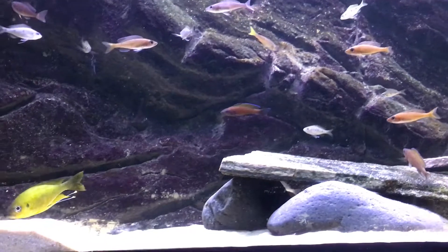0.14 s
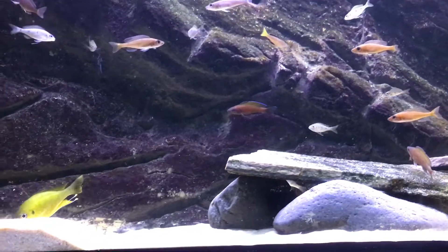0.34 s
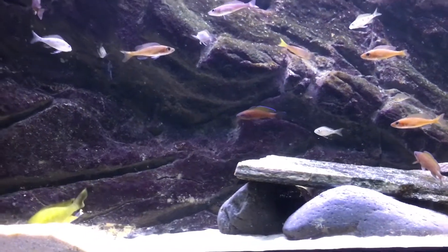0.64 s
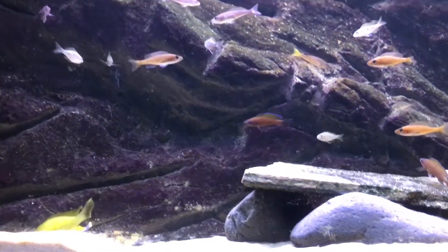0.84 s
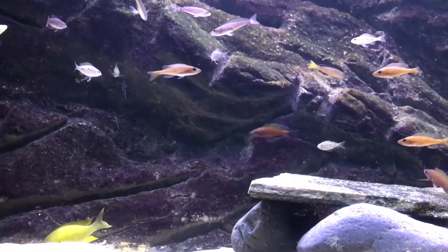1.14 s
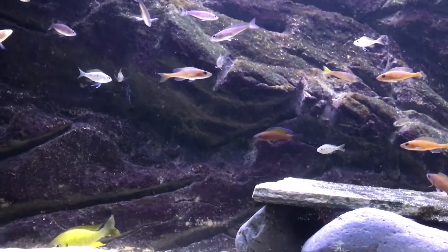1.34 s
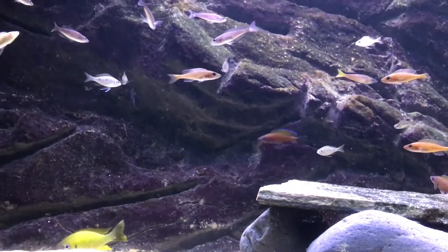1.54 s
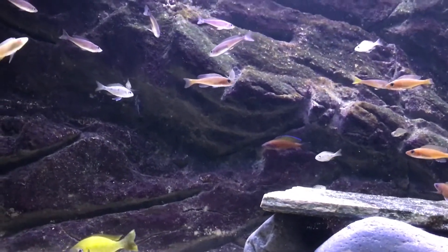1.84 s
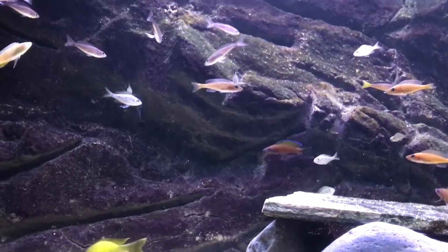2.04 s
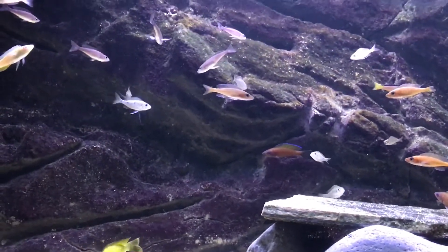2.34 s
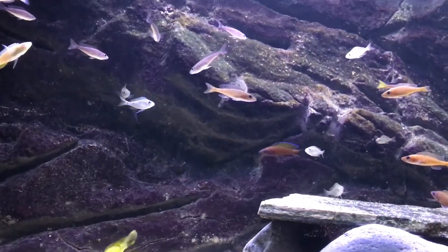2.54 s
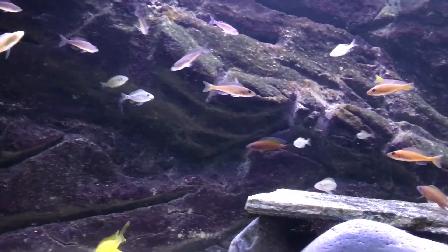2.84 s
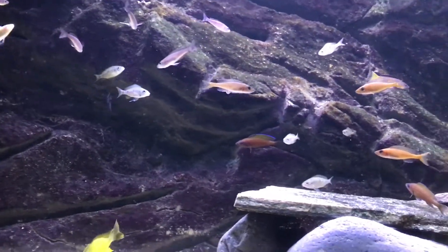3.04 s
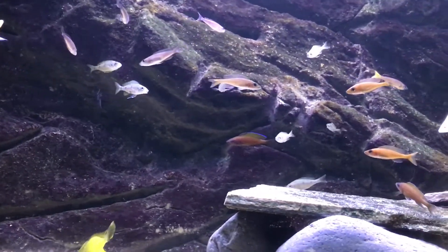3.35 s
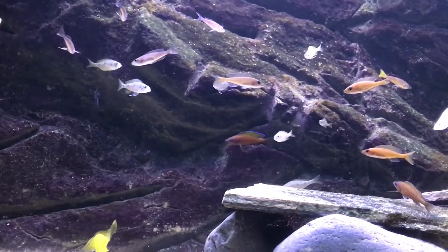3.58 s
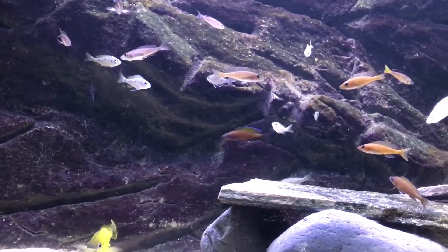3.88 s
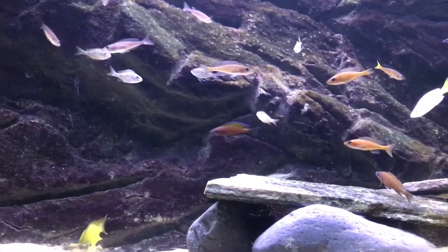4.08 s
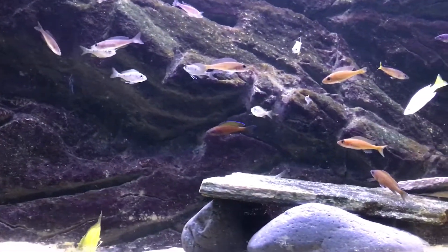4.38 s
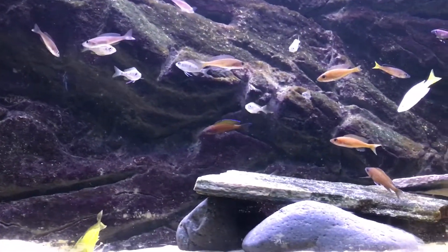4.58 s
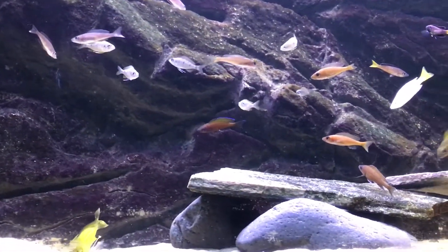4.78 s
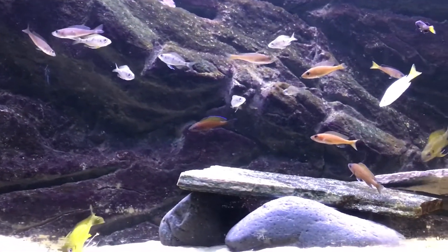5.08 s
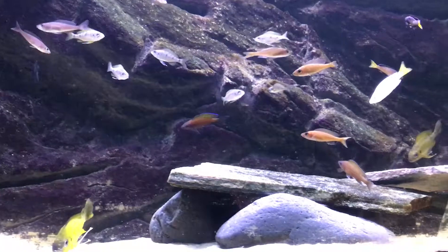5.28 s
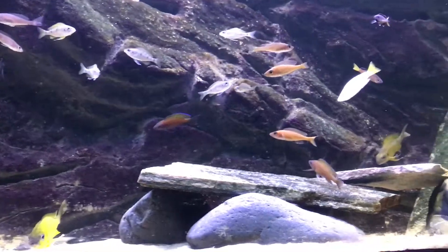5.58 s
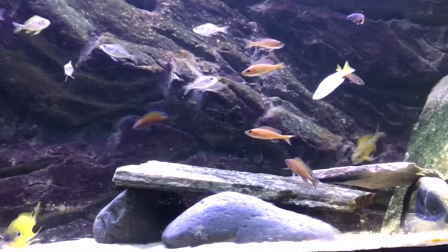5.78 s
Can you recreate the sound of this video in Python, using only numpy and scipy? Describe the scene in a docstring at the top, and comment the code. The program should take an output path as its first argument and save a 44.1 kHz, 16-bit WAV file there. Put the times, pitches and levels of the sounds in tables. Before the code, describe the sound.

Water pours and splashes steadily into an indoor fish tank, gurgling and fizzing over the low hum of a pump.

```python
"""Fish tank filter return and pump.

Water pours into a tank indoors while the pump hums. The stream churns the surface and drags
air under: large bubbles gurgle, small ones fizz and ping, stray drops splat. The air space
over the water rings with a few resonances and a short tail."""
import sys
import numpy as np
from scipy import signal
from scipy.fft import rfft, irfft
from scipy.io import wavfile
from scipy.ndimage import uniform_filter1d

SR = 44100
rng = np.random.default_rng(int(sys.argv[2]) if len(sys.argv) > 2 else 0)


def to_wav(s):
    """Save 16-bit WAV."""
    ch = np.atleast_2d(s).T  # columns
    pcm = np.round(np.clip(ch, -1, 1) * 32767)  # PCM
    wavfile.write(sys.argv[1], SR, pcm.astype(np.int16))


N = 261072
TIME_S, FREQS_HZ = np.arange(N) / SR, np.fft.rfftfreq(N, 1 / SR)

# outflow surges: (crest time [s], length [s], rumble level [dB], churn level [dB])
SURGE_EVENTS = [(.6, .15, -59, -61), (.74, 0.34, -43.5, -61), (1.0, 0.11, -57, -56), (1.74, 0.13, -60, -57),
                (2.3, .35, -52, -70), (2.64, 0.21, -52, -56), (2.977, 0.19, -45, -55),
                (3.23, .18, -52, -75), (3.97, 0.12, -53, -56), (4.09, 0.18, -48, -68),
                (4.592, .12, -44, -77), (4.984, 0.18, -44, -58), (5.392, 0.23, -49, -61),
                (5.862, 0.21, -45.5, -59.5)]
# water spectra: (frequency [Hz], relative density [dB])
RUMBLE_SPECTRUM = [(15, -28), (30, -9.5), (47, 4.5), (64, 3.5), (90, 1), (112, -11), (170, -26), (400, -78)]
CHURN_SPECTRUM = [(60, -24), (120, 0), (168, 2.5), (195, -4.5), (240, -2), (325, -2), (355, -6),
                  (398, -7.5), (415, -18.5), (600, -26.5), (1500, -72)]
GURGLE_SPECTRUM = [(200, -2), (420, -1), (520, 0), (650, 2), (1000, 2), (1250, -3.5), (1480, -7),
                   (2000, -11.5), (3000, -21.5), (8000, -49)]
FIZZ_SPECTRUM = [(700, -17), (1700, 3), (2500, 2.5), (3100, -0.5), (3800, 2), (4800, 0), (6200, 1.5),
                 (7200, -3.5), (9500, -3.5), (11000, -8), (12600, -8), (14000, -13.5), (15700, -14)]
SPLAT_SPECTRUM = [(500, -17), (1900, 5.5), (6200, -2.5), (9500, 2), (10500, -13.5), (13000, -3),
                  (14200, -18), (16000, -3)]
# spray strength: (time [s], relative level [dB])
SPRAY_CURVE = [(.2, -68.5), (.52, -65.3), (.75, -67), (1.6, -67), (2.15, -68.2), (2.401, -67),
               (3.001, -66.5), (3.32, -68.8), (3.7, -66.5), (4.3, -68), (4.5, -66.5), (5.9, -68.5)]
# distinct bubbles: (time [s], pitch [Hz], level [dB])
PING_EVENTS = [(.474, 1690, -53.5), (.573, 5600, -52.5), (.785, 2390, -54), (1.128, 7100, -51.5),
               (1.294, 9040, -54), (1.461, 6370, -52), (2.608, 5430, -52), (2.610, 8700, -51),
               (2.72, 6200, -55), (2.770, 7100, -52), (2.894, 8500, -50.5), (2.900, 6300, -52),
               (3.016, 7900, -48), (3.016, 3700, -49.5), (3.126, 2250, -51.5), (3.623, 6000, -54.5),
               (3.654, 5600, -50), (4.196, 5300, -50.5), (4.229, 3370, -54), (4.500, 2040, -52.5),
               (4.521, 2850, -52), (5.125, 3370, -55), (5.627, 5260, -52)]
# large drops: (time [s], relative level [dB])
DROP_EVENTS = [(.108, -43), (1.128, -48), (1.6367, -41.5), (1.6635, -46), (1.6806, -41.5), (1.811, -48),
               (2.015, -44), (3.622, -48), (4.4113, -38), (4.5005, -46), (4.5208, -44)]
# gulps ringing the air under the lid: (crest time [s], length [s], pitch [Hz], level [dB])
GULP_EVENTS = [(.75, .2, 714, -60), (.855, .08, 942, -58.5), (0.974, .15, 714, -62), (.99, .1, 655, -59),
               (1.353, .15, 716, -56.5), (1.59, 0.13, 716, -60), (1.84, .12, 645, -60),
               (2.77, .14, 945, -62), (3.362, .2, 715, -64), (3.63, 0.26, 715, -63), (4.85, .16, 715, -64),
               (5.9, .16, 713, -61)]
# tank and air resonances: (frequency [Hz], width [Hz], gain [dB])
TANK_MODES = [(380.4, 14, 3.5), (579, 22.4, 10.5), (643, 58, 6.5), (772, 30, -6), (913, 54, 2),
              (1146, 74, 2), (1310, 39, 5.5), (1980, 70, 1.5), (2335, 210, 5.5), (2860, 68, 2.5),
              (5320, 290, 5.5), (6070, 210, 2), (9300, 700, -0.5), (10410, 530, -5.5)]
# pump hum: (mains multiple, level [dB])
PUMP_HARMONICS = [(1, -35), (2, -50), (3, -63), (4, -67.5), (5, -75), (6, -65.5), (8, -73), (10, -77),
                  (11, -70), (15, -72.5), (26, -82)]


def outflow(rumble_db=-56.5, churn_db=-58):
    """The jet stirs the surface steadily and heaves it in surges; their powers add."""
    rumble_gain, churn_gain = amp(rumble_db), amp(churn_db)
    for crest_s, length_s, surge_rumble_db, surge_churn_db in SURGE_EVENTS:
        rumble_gain = np.hypot(rumble_gain, swell(crest_s, length_s, surge_rumble_db))
        churn_gain = np.hypot(churn_gain, swell(crest_s, length_s, surge_churn_db))
    rumble = steadied(in_tank(rng.standard_normal(N), RUMBLE_SPECTRUM), lumpiness=0.56)
    churn = steadied(in_tank(rng.standard_normal(N), CHURN_SPECTRUM), lumpiness=0.73)
    return rumble_gain * rumble + churn_gain * churn


def gurgle(bubbles_db=-60, rush_db=-62):
    """The jet drags air under: large bubbles in an even rush."""
    flow = amp(1.2 * drift(rate_hz=20))
    large = swarm(low_hz=281, high_hz=3193, per_s=2200, cycles=13, spread_db=2.5, flow=flow)
    crowd = in_tank(echoes(large, t60_s=0.13, wet_db=-2.5), GURGLE_SPECTRUM)
    rush = in_tank(rng.standard_normal(N), GURGLE_SPECTRUM)
    return amp(bubbles_db) * crowd + amp(rush_db) * rush


def fizz(froth_db=-67, spray_ticks_db=-75, wash_db=-68, ticks_per_s=150):
    """Small bubbles and spray ticks clump over a smooth wash."""
    flow = amp(2.2 * drift(rate_hz=25))
    small = swarm(low_hz=1303, high_hz=16190, per_s=2600, cycles=5.5, spread_db=4, flow=flow)
    hits = rng.random(N) < ticks_per_s * flow / SR
    ticks = hits * rng.choice([-1, 1], N) * amp(4.4 * np.minimum(rng.exponential(1, N), 3.5))
    froth = amp(froth_db) * in_tank(echoes(small, t60_s=0.097, wet_db=-0.5), FIZZ_SPECTRUM)
    spray = amp(spray_ticks_db) * in_tank(echoes(ticks, t60_s=0.1, wet_db=3), FIZZ_SPECTRUM)
    wash = amp(wash_db) * in_tank(rng.standard_normal(N), FIZZ_SPECTRUM)
    return amp(spray_db()) * (froth + spray + wash)


def pings(snap_gain_db=-1.5, faint_db=-53.5, spread_db=5, low_hz=3200, high_hz=9900):
    """Single bubbles pinch off with a snap around their pitch; fainter ones come at random."""
    out = np.zeros(N)
    faint = [(time_s, low_hz + (high_hz - low_hz) * pitch, faint_db - spread_db * faintness)
             for time_s, pitch, faintness in strays(count=36, crowding=4)]
    for time_s, hz, db in PING_EVENTS + faint:
        snap_spectrum = [(hz / 4, -35), (hz / 1.3, -8), (hz, 0), (hz * 1.25, -7), (hz * 2.2, -28)]
        add(out, time_s, amp(db) * bubble(hz, cycles=6, rise=0.0066))
        add(out, time_s, amp(db + snap_gain_db) * snap(snap_spectrum, decay_s=0.0012))
    return echoes(out, t60_s=0.13, wet_db=-2)


def splats(gain_db=-1.5, faint_db=-51, spread_db=5):
    """Drops slap the water: a few large, small ones at random."""
    out = np.zeros(N)
    faint = [(time_s, faint_db - spread_db * faintness)
             for time_s, faintness, _ in strays(count=12, crowding=4.4)]
    for time_s, db in DROP_EVENTS + faint:
        add(out, time_s, amp(db + gain_db) * snap(SPLAT_SPECTRUM, decay_s=0.00068))
    return echoes(out, t60_s=0.11, wet_db=-3)


def air_space(pitch_hz=716, width_hz=13, steady_db=-72, waver_db=2):
    """Splashing blows a hollow, fuzzy note over the water; each gulp swells one resonance."""
    resonance = 1 / (1 + 2j * (FREQS_HZ - pitch_hz) / width_hz) ** 2
    band = irfft(rfft(rng.standard_normal(N)) * resonance, N)
    note = signal.hilbert(steadied(band, lumpiness=0.3))
    # phasors shift the note to each gulp's pitch
    gulps = sum(swell(crest_s, length_s, db) * np.exp(2j * np.pi * (hz - pitch_hz) * (TIME_S - crest_s))
                for crest_s, length_s, hz, db in GULP_EVENTS)
    steady = amp(steady_db + waver_db * drift(rate_hz=3))
    return (note * (gulps + 1j * steady)).real


def pump(mains_hz=50.018, waver=0.17, waver_hz=3, lag_cycles=0.07):
    """The rotor kicks once per mains cycle; upper orders lag and waver with impeller load."""
    out = np.zeros(N)
    for order, db in PUMP_HARMONICS:
        unrest = waver * (1 - 1 / order) * (drift(waver_hz) + 1j * drift(waver_hz))
        phase_cycles = order * mains_hz * TIME_S + lag_cycles * (order - 1) * rng.uniform(-0.99, 1)
        out -= amp(db) * ((1 + unrest) * np.exp(2j * np.pi * phase_cycles)).real
    return out


def bubble(hz, cycles, rise):
    """Trapped air swells, rings down and rises in pitch as it nears the surface; peak 1."""
    age = np.arange(int(6 * cycles / hz * SR) + 2) * hz / SR / cycles  # in decay times
    envelope = (1 - np.exp(-age / 0.28)) * np.exp(-age)
    ring = envelope * np.sin(2 * np.pi * cycles * (age + rise * age ** 2 / 2))
    return ring / abs(ring).max()


def swarm(low_hz, high_hz, per_s, cycles, spread_db, flow, pitches=120):
    """Random bubbles, born faster as the flow swells; equal power per Hz, rms 1."""
    out = np.zeros(N)
    per_pitch = int(per_s * N / SR / pitches) + 1
    births = rng.choice(N, (per_pitch, pitches), p=flow / flow.sum())
    for starts, hz in zip(births.T, np.geomspace(low_hz, high_hz, pitches)):
        ring = bubble(hz, cycles * rng.uniform(0.78, 1.3), rise=0.016)
        gains = unit_rms(amp(spread_db * np.minimum(rng.exponential(1, len(starts)), 4)))
        rings = np.outer(gains, ring / np.linalg.norm(ring))
        indices = (starts[:, None] + np.arange(len(ring))) % N
        out += np.bincount(indices.ravel(), rings.ravel(), N) * np.sqrt(hz)
    return unit_rms(out)


def snap(spectrum, decay_s):
    """The surface tears in a brief ragged burst; peak 1."""
    age = TIME_S[:SR // 50] / decay_s
    colour = amp(spectrum_db(spectrum, np.fft.rfftfreq(len(age), 1 / SR)))
    noise = irfft(np.exp(2j * np.pi * rng.random(len(colour))) * colour, len(age))
    burst = noise * age * np.exp(-age)
    return burst / abs(burst).max()


def in_tank(x, spectrum):
    """Colours x by a spectrum and the tank resonances; rms 1."""
    grid_hz = np.geomspace(10, SR / 2, 2000)
    modes_db = sum(db * 0.5 ** ((2 * (grid_hz - hz) / width_hz) ** 2) for hz, width_hz, db in TANK_MODES)
    gain = np.interp(FREQS_HZ, grid_hz, amp(spectrum_db(spectrum, grid_hz) + modes_db))
    return unit_rms(irfft(rfft(x) * gain, N))


def echoes(x, t60_s, wet_db, path_count=16, block_samples=512):
    """Reflections off glass, lid and water; ripples keep changing the paths."""
    age_s = TIME_S[:8192]
    tails = rng.standard_normal((path_count, len(age_s))) * (age_s > 0.002) * amp(-60 * age_s / t60_s)
    paths = rfft(tails / np.linalg.norm(tails, axis=1, keepdims=True))
    blocks = np.pad(x, (0, -N % block_samples)).reshape(-1, block_samples)
    block_paths = paths[rng.integers(0, path_count, len(blocks))]
    wet = np.zeros(N)
    for k, tail in enumerate(irfft(rfft(blocks, len(age_s)) * block_paths)):
        add(wet, k * block_samples / SR, tail)
    return x + amp(wet_db) * wet


def spray_db():
    """Spray strength about its mean."""
    time_s, db = np.transpose(SPRAY_CURVE)
    return np.interp(TIME_S, time_s, db) - db.mean()


def strays(count, crowding):
    """Random times, denser in strong spray: (time [s], draw [0-1], draw [0-1])."""
    cumulative = np.cumsum(amp(crowding * spray_db()))
    draws = rng.random((count, 3))
    time_s = np.interp((np.arange(count) + draws[:, 0]) / count, cumulative / cumulative[-1], TIME_S)
    return np.column_stack([time_s, draws[:, 1:]])


def swell(crest_s, length_s, db):
    """Gaussian rise and fall."""
    return amp(db) * np.exp(-np.minimum((2 * (TIME_S - crest_s) / length_s) ** 2, 50))


def steadied(x, lumpiness):
    """Evens out chance swells; lumpiness 1 keeps all; rms 1."""
    power = abs(uniform_filter1d(x ** 2, size=SR // 12)) + 1e-9
    return unit_rms(x / power ** ((1 - lumpiness) / 2))


def drift(rate_hz):
    """Slow random wander; rms 1."""
    steps = signal.resample_poly(rng.standard_normal(1024), 8, 1)
    return unit_rms(np.interp(TIME_S * rate_hz * 16, np.arange(len(steps)), steps))


def spectrum_db(spectrum, hz):
    """Interpolates over log frequency."""
    knots_hz, db = np.transpose(spectrum)
    return np.interp(np.log(hz + 1), np.log(knots_hz), db)


def add(mix, time_s, sound):
    """Mixes a sound in at time_s."""
    part = mix[max(round(time_s * SR), 0):][:len(sound)]
    part += sound[:len(part)]


def unit_rms(x):
    """Scales to rms 1."""
    return x / np.sqrt(np.mean(x ** 2) + 1e-20)


def amp(db):
    """Decibels to gain."""
    return 10 ** (np.asarray(db) / 20)


def scene():
    """Pump and water from in front of the glass; mono."""
    return (pump() + outflow() + gurgle() + air_space() + fizz() + pings() + splats())[None]


def record(dry):
    """Steep low-pass."""
    cutoff_hz = 15750
    taps = signal.firwin(511, cutoff_hz, window=("kaiser", 9), fs=SR)
    return signal.oaconvolve(dry, taps[None], "same")


dry = scene()
out = record(dry)
to_wav(out)
```